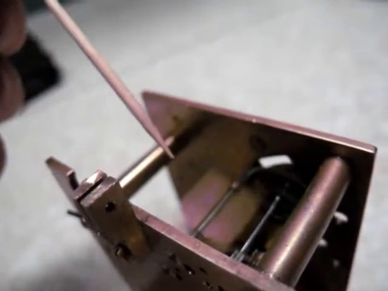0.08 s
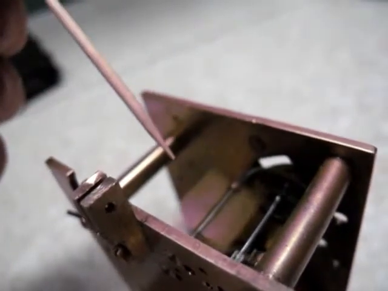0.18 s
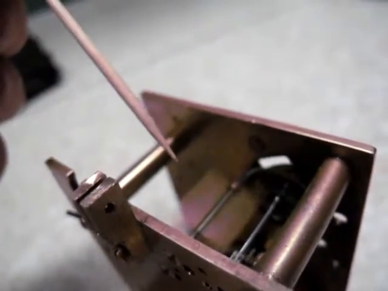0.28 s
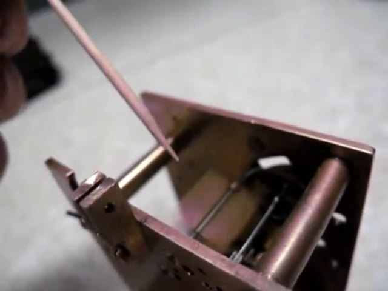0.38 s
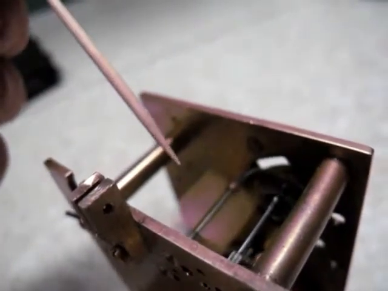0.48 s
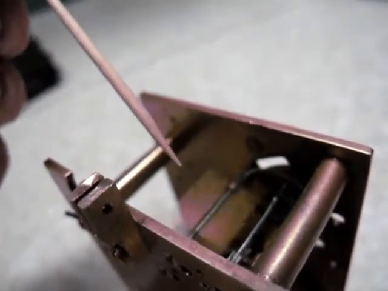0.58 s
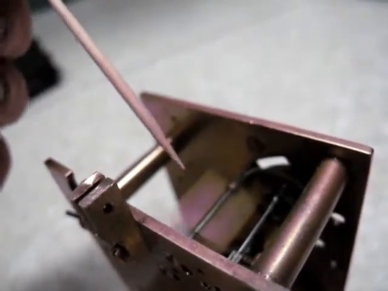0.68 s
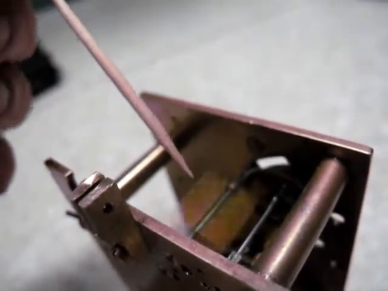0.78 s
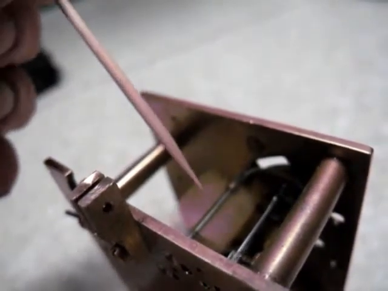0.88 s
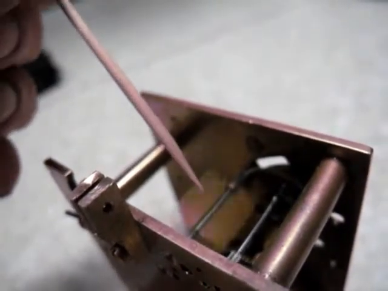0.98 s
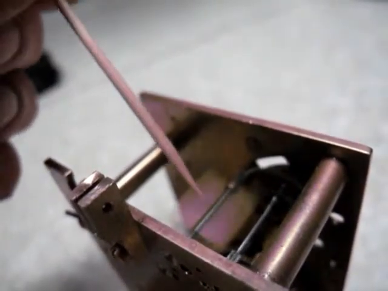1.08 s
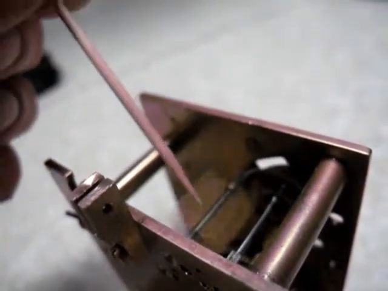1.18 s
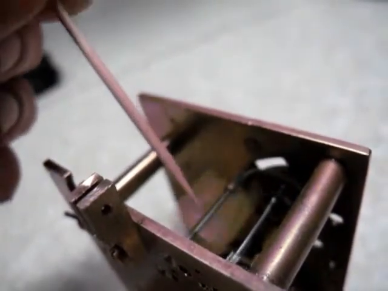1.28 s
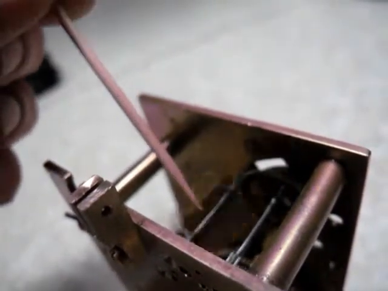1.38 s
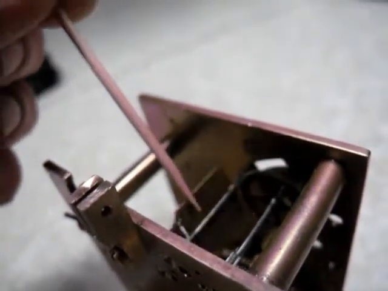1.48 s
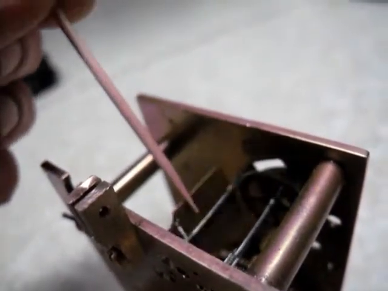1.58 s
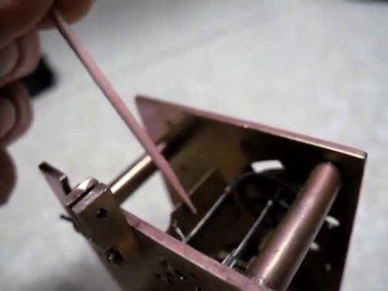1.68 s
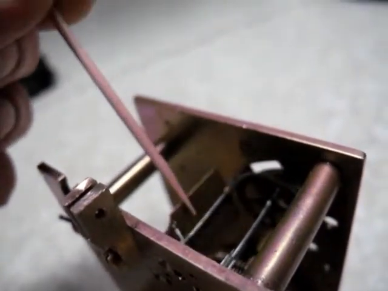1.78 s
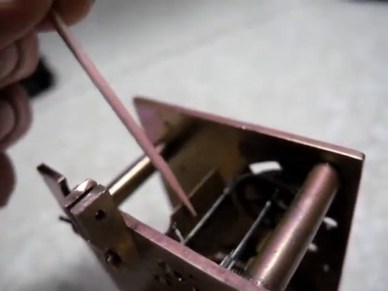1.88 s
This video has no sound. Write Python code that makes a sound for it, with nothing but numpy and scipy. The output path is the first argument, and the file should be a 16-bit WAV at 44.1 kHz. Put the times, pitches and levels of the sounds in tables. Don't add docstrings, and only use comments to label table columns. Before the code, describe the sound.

Clock gears whir and chatter with rising speed until a stick rattles against the fly and halts them

```python
import sys
import numpy as np
from scipy import signal
from scipy.fft import rfft, irfft
from scipy.io import wavfile

SR = 44100
rng = np.random.default_rng(int(sys.argv[2]) if len(sys.argv) > 2 else 0)


def unload_audio(sound):
    columns = np.transpose(np.atleast_2d(sound))
    steps = np.round(np.clip(columns, -1, 1) * 32767)
    wavfile.write(sys.argv[1], SR, steps.astype(np.int16))


def volts(x):
    e = np.asarray(x, float) / 20
    return 10 ** e


N = 85995


def rms_one(x):
    return x / np.sqrt(np.mean(x ** 2) + 1e-20)


def drift(rate_hz):
    r = np.exp(-2 * np.pi * rate_hz / SR)
    wander = signal.lfilter([1], [1, -2 * r, r * r], rng.standard_normal(N + SR))
    return rms_one(wander[SR:])


def ring(clicks, hz, t60_s):
    r = volts(-60 / (t60_s * SR))
    w = 2 * np.pi * hz / SR
    return signal.lfilter([0, np.sin(w)], [1, -2 * r * np.cos(w), r * r], clicks + 1e-18)


def ring_body(modes, push):
    return sum(volts(db) * (-1) ** k * ring(push, hz, t60_s) for k, (hz, db, t60_s) in enumerate(modes))


def colour(x, spectrum):
    hz, db = np.transpose(spectrum)
    f = np.maximum(np.fft.rfftfreq(N, 1 / SR), 1)
    gain = volts(np.interp(np.log(f), np.log(hz), db))
    return rms_one(irfft(rfft(x) * gain, N))


def strike(modes, s, db, varies_db):
    out = np.zeros(N)
    own = rng.uniform(-1, 1, (len(s), len(modes))) * np.sqrt(3)
    for k, (hz, level_db, t60_s) in enumerate(modes):
        clicks = np.zeros(N)
        np.add.at(clicks, (s * SR).astype(int), volts(db + level_db + varies_db * own[:, k]))
        out += (-1) ** k * ring(clicks, hz, t60_s)
    return out


def teeth():
    teeth_per_s, spread_db = 700, 2.5
    fly_turns_per_s, fly_swing_db, uneven_db = 57, 4.0, 2.0
    turn = np.cumsum(fly_turns_per_s * (1 + 0.1529 * drift(7.85))) / SR
    sizes = volts(spread_db * np.minimum(rng.exponential(1, N), 2.5))
    sizes = sizes * rng.choice([-1, 1], N)
    swing_db = fly_swing_db * np.sin(2 * np.pi * turn)
    load = volts(swing_db + uneven_db * np.clip(drift(21), -2, 1))
    contacts = rng.random(N) < teeth_per_s / SR
    return rms_one(sizes * load * contacts)


# t/s, level/dB
TRAIN_DRIVE = [
    (0.0, -47.5),
    (0.158, -41.5),
    (0.284, -39.5),
    (0.442, -38),
    (1.27, -33),
    (1.31, -34.5),
    (1.424, -35),
    (1.5, -51),
]
# f/Hz, level/dB, T60/s
PLATE_MODES = [(1700, -22, .01), (2500, -17, .012), (2900, -15, .012), (3190, -7, .025), (3280, -4, .028),
               (3650, -14, .012), (3850, -13, .014), (4100, -14, .01), (5020, -11, .02), (5250, -14, .012),
               (5900, -15, .012), (6300, -18, .01)]
# f/Hz, level/dB, T60/s
ARBOR_MODES = [(7300, -17, .012), (7800, -15, .01), (8340, -2, .025), (8430, -3, .03), (8530, -5, .02),
               (8850, -12, .015), (9150, -14, .015), (9600, -14, .01), (9940, -14, .022), (10300, -14, .01),
               (10700, -15, .01), (12900, -22, .015)]
# f/Hz, level/dB, T60/s
BENCH_MODES = [(254, -33.5, 0.11), (374.8, -31.5, 0.23), (418.3, -34.5, 0.21), (491, -33.5, 0.14)]
# f/Hz, density/dB per Hz
RUB_SPECTRUM = [(500, -52), (800, -13), (2200, -10), (3800, -2), (4600, -16.5), (8400, -6), (10800, -8.5),
                (15500, -15)]


def train():
    stop_s, stop_db_per_s = 1.421, 700
    tooth_db, rub_db, rub_grain = 2.5 - 26.5, -5, 1.5
    t = np.arange(N) / SR
    drive_db = np.interp(t, *np.transpose(TRAIN_DRIVE))
    drive = volts(drive_db - stop_db_per_s * np.maximum(t - stop_s, 0))
    low, high = teeth(), teeth()
    rings = ring_body(PLATE_MODES, drive * (low + 0.1 * high))
    rings += ring_body(ARBOR_MODES, drive * (high + 0.66 * low))
    for hz, db, t60_s in BENCH_MODES:
        rings += volts(db) * ring(drive * rng.standard_normal(N), hz, t60_s)
    scrape = rng.standard_normal(40) * np.exp(-np.arange(40) / 12) / 2.5
    grit = signal.lfilter(scrape, [1], low + high)
    rough = rng.standard_normal(N) * volts(1.7 * drift(67))
    rub = colour(rub_grain * grit + rough, RUB_SPECTRUM)
    return volts(tooth_db) * rings + volts(rub_db) * drive * rub


# t/s, peak/dB
VANE_SLAPS = [(1.2854, -8), (1.3022, -9), (1.3116, -10), (1.3201, -8), (1.3303, -11), (1.3397, -8),
              (1.3511, -11), (1.3616, -10), (1.3744, -12), (1.3866, -11), (1.4022, -11), (1.4187, -13),
              (1.4482, -17), (1.5535, -28), (1.6146, -40)]
# f/Hz, level/dB, T60/s
VANE_MODES = [(540, -26, 0.013), (1000, -19.5, 0.0047), (1690, -16, 0.0066), (2080, -12, 0.0074),
              (3240, -10.5, 0.0034), (4170, -9, 0.0058), (5960, -8.5, 0.0062), (7230, -8.5, 0.006),
              (8850, -0.5, 0.0041), (10500, -2.5, 0.0032), (14600, -5, 0.0016)]
# f/Hz, level/dB, T60/s
FRAME_MODES = [(3278, -29, .15), (3340, -33, .08), (5000, -28, .05), (8382, -33, .08), (9141, -27, .07),
               (9750, -33, .06)]
# f/Hz, density/dB per Hz
TAIL_SPECTRUM = [(400, -44), (1000, -12), (3500, -10.5), (6500, -8), (9000, 1), (11000, -4), (15500, -18)]


def slaps():
    lag_s, slap_db, varies_db, frame_varies_db = -.0004, -5.5, 1.5, 3.0
    rebound_s, rebound_db = .0009, -10
    tail_db, tail_t60_s = -25, 0.17
    s, db = np.transpose(VANE_SLAPS)
    s, db = s + lag_s, db + slap_db
    crack = strike(VANE_MODES, s, db, varies_db)
    back_s = s + rebound_s * rng.uniform(0.8, 0.97, len(s))
    crack += strike(VANE_MODES, back_s, db + rebound_db, varies_db)
    frame = strike(FRAME_MODES, s, db, frame_varies_db)
    energy = np.zeros(N)
    energy[(s * SR).astype(int)] = volts(2 * db)
    envelope = np.sqrt(signal.lfilter([1], [1, -volts(-120 / tail_t60_s / SR)], energy + 1e-18))
    tail = envelope * colour(rng.standard_normal(N), TAIL_SPECTRUM)
    return crack + frame + volts(tail_db) * tail


# t/s, level/dB
PLATE_KNOCKS = [(0.0338, -47), (0.0957, -36), (0.2374, -32.5), (0.2633, -30.5), (0.2927, -35),
                (0.2983, -30), (0.3204, -26.5), (0.375, -27.5), (0.4054, -32), (0.4844, -35), (0.5127, -49),
                (0.5329, -47), (0.581, -56), (0.627, -29), (0.6507, -31), (0.7365, -33), (0.7504, -25.5),
                (0.8066, -28.5), (0.9188, -29.5), (1.0331, -24), (1.061, -34), (1.071, -29), (1.0874, -30),
                (1.1034, -36), (1.1423, -24), (1.1677, -19), (1.2012, -22.5), (1.2192, -20.5),
                (1.3496, -35), (1.4092, -27)]
# t/s, peak/dB
ARBOR_KNOCKS = [(0.144, -38), (0.164, -31), (0.2418, -28.5), (0.3036, -31.5), (0.3576, -30), (0.4193, -48),
                (0.4325, -34), (0.4645, -29), (0.5124, -29.5), (0.5611, -31.5), (0.6169, -25.5),
                (0.661, -26), (0.6973, -25), (0.7193, -46), (0.7817, -29), (0.8018, -34), (0.9227, -24),
                (0.9517, -26), (0.99, -27.5), (1.019, -28), (1.054, -28), (1.0911, -29), (1.1248, -23),
                (1.1515, -23.5), (1.1778, -21.5), (1.1921, -21.5), (1.2074, -24.5), (1.2488, -22),
                (1.2645, -35), (1.3794, -19.5)]


def knocks():
    lag_s, grind_s = .001, .0015
    crack_db, varies_db, touch_loss_db = -6, 3.0, 3.5
    out = np.zeros(N)
    for table, modes, gain_db in ((PLATE_KNOCKS, PLATE_MODES, -3.5), (ARBOR_KNOCKS, ARBOR_MODES, -4)):
        s, db = np.transpose(table)
        s, db = s + lag_s, db + gain_db
        late_s = np.cumsum(rng.uniform(.5, 1.5, (len(s), 3)), axis=1) * grind_s
        for k in range(3):
            touch_s = s + late_s[:, k] - late_s[:, 0]
            out += strike(modes, touch_s, db - touch_loss_db * k, varies_db)
        out += strike(VANE_MODES[3:-1], s, db + crack_db, varies_db)
    return out


# start/s, end/s, level/dB, low f/Hz, high f/Hz
SLEEVE = (0, 1.93, -65, 600, 2600)


def rustle():
    start_s, end_s, db, low_hz, high_hz = SLEEVE
    progress = np.clip((np.arange(N) / SR - start_s) / (end_s - start_s), 0, 1)
    swell = np.sin(np.pi * progress)
    band = signal.butter(2, [low_hz, high_hz], "band", fs=SR, output="sos")
    cloth = signal.sosfilt(band, rng.standard_normal(N))
    return volts(db + 3.7 * drift(15)) * swell * rms_one(cloth)


# f/Hz, density/dB per Hz
ROOM_SPECTRUM = [(15, -32), (25, -4.5), (188, -4.5), (399, -9), (871, -11.5), (5280, -24.5), (6050, -21.5),
                 (6550, -25.5), (15500, -34.5)]
# f/Hz, level/dB, T60/s
HUM_MODES = [(46.4, -72.5, 0.68), (96.6, -67.5, 0.94), (93, -77, 1.7), (183.8, -72, 0.26),
             (193, -69.5, 3.7), (303, -73, 1.7)]


def room():
    out = volts(-57) * colour(rng.standard_normal(N), ROOM_SPECTRUM)
    for hz, db, t60_s in HUM_MODES:
        line = ring(rng.standard_normal(N + SR), hz, t60_s)[SR:]
        out += volts(db) * rms_one(line)
    return out


def scene():
    return (train() + slaps() + knocks() + rustle() + room())[None]


def top_cut(x):
    return signal.sosfilt(signal.butter(12, 16480, fs=SR, output="sos"), x)


def record(dry):
    shelf_hz, shelf_db = 10270, -8.5
    dip_hz, dip_wide_hz = 12100, 900
    notch_hz, notch_wide_hz = 11760, 450
    hiss_db, whine_hz, whine_db, cutoff_hz = -78, 5880, -61, 15800
    dull = signal.sosfilt(signal.butter(4, shelf_hz, fs=SR, output="sos"), dry)
    top = signal.sosfilt(signal.butter(4, shelf_hz, "high", fs=SR, output="sos"), dry)
    x = dull + volts(shelf_db) * top
    dipped = signal.lfilter(*signal.iirnotch(dip_hz, dip_hz / dip_wide_hz, SR), x)
    x = .75 * dipped + .25 * x
    x = x + volts(hiss_db) * rng.standard_normal(N)
    x = signal.lfilter(*signal.iirnotch(notch_hz, notch_hz / notch_wide_hz, SR), x)
    x = x + volts(whine_db) * np.sqrt(2) * np.sin(2 * np.pi * whine_hz * np.arange(N) / SR)
    x = signal.sosfilt(signal.ellip(10, .2, 45, cutoff_hz, fs=SR, output="sos"), x)
    return top_cut(x)


dry = scene()
out = record(dry)
unload_audio(out)
```